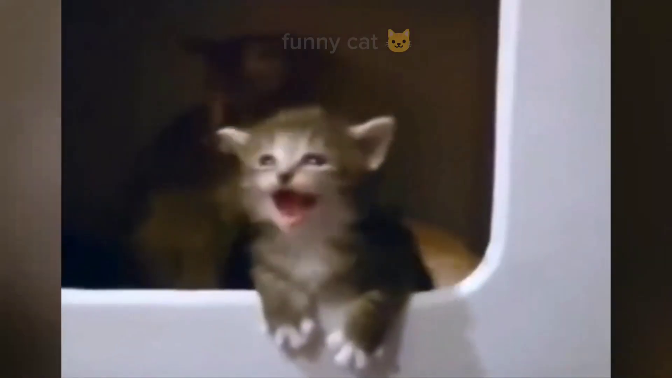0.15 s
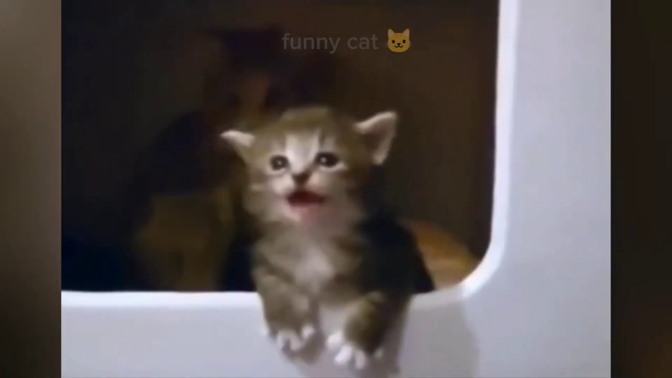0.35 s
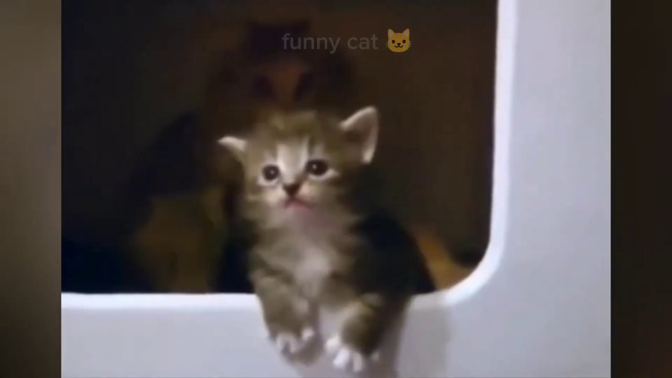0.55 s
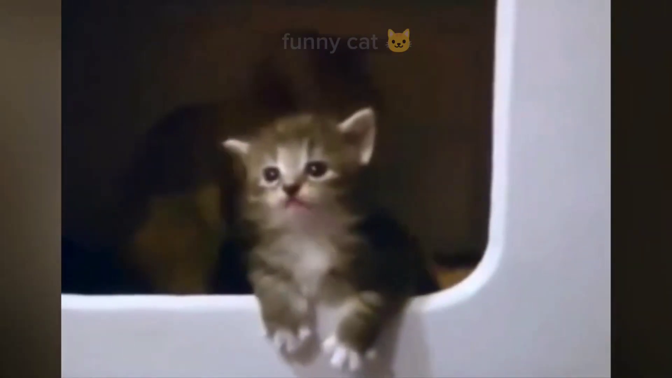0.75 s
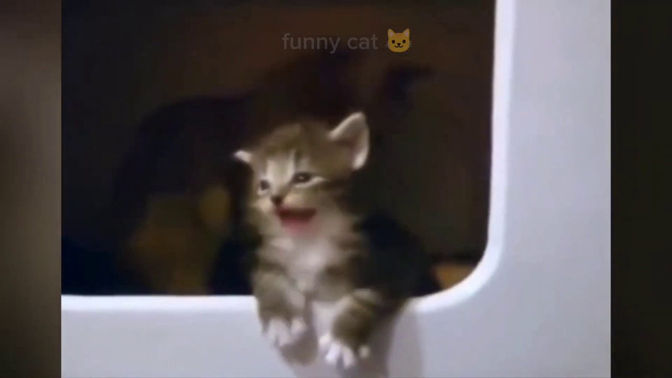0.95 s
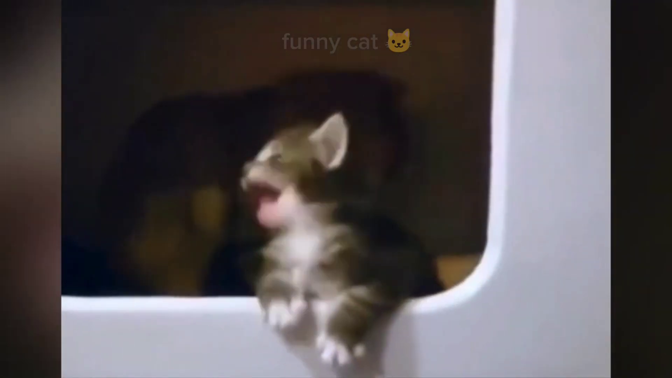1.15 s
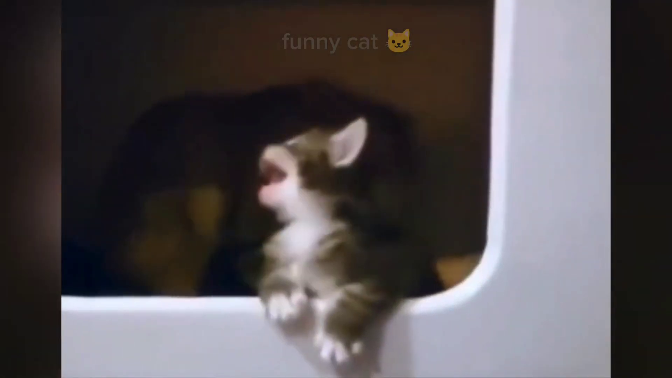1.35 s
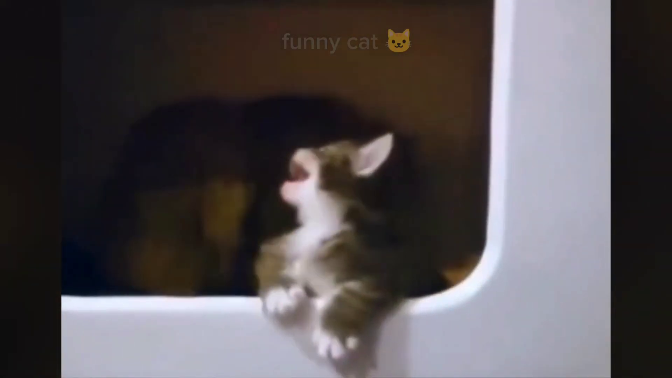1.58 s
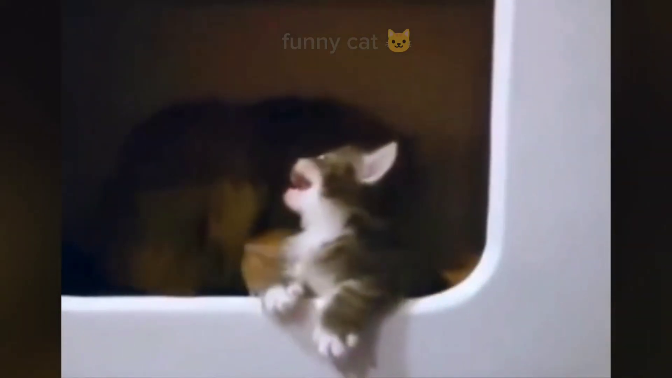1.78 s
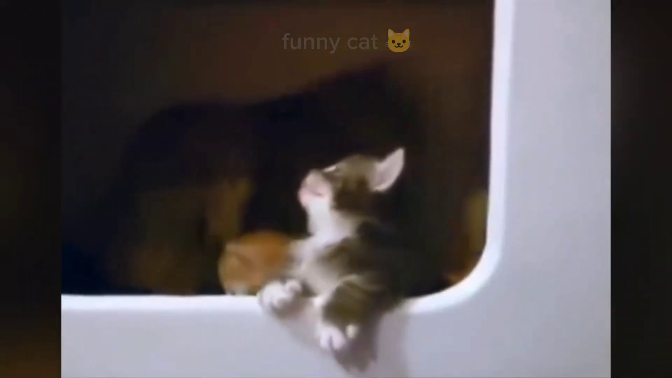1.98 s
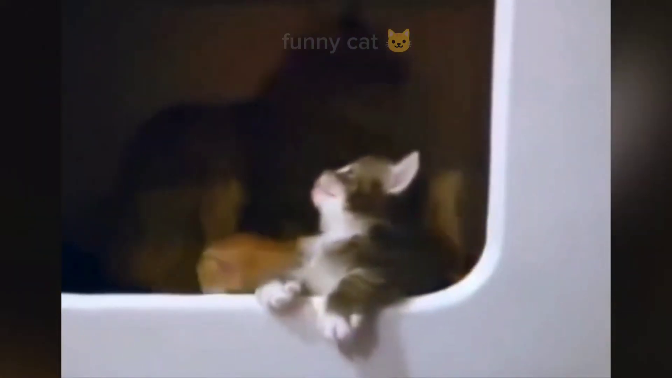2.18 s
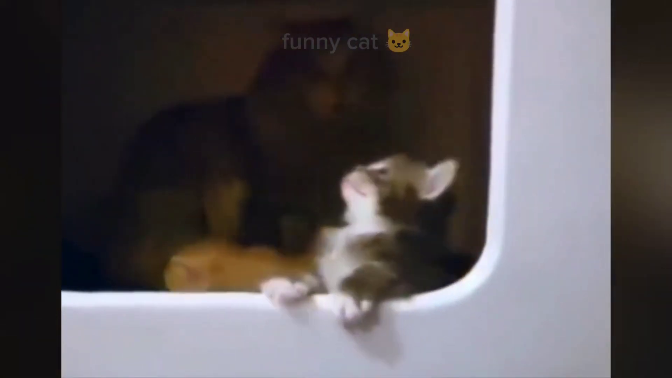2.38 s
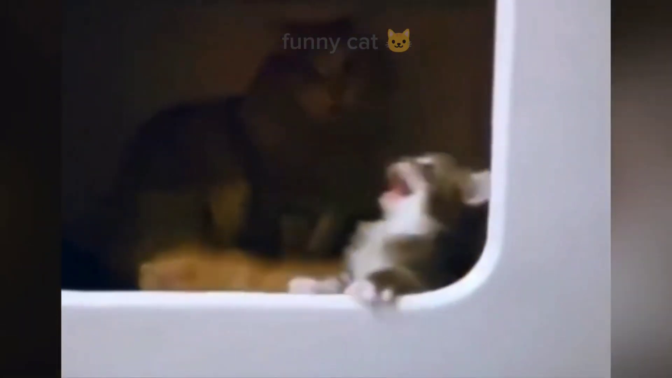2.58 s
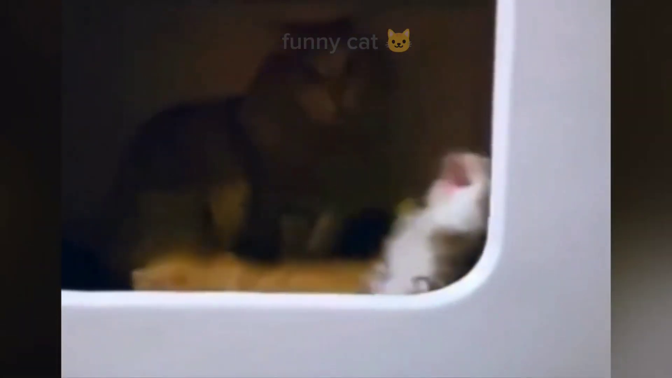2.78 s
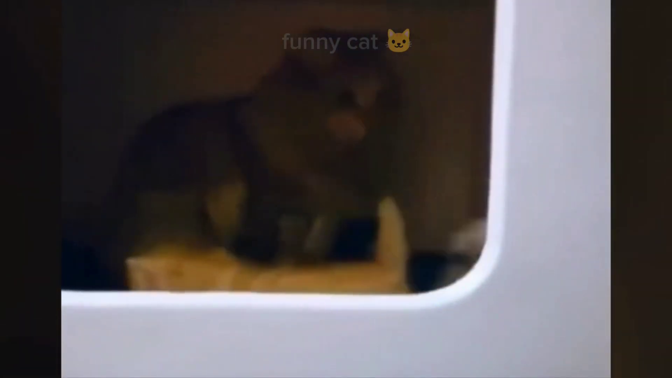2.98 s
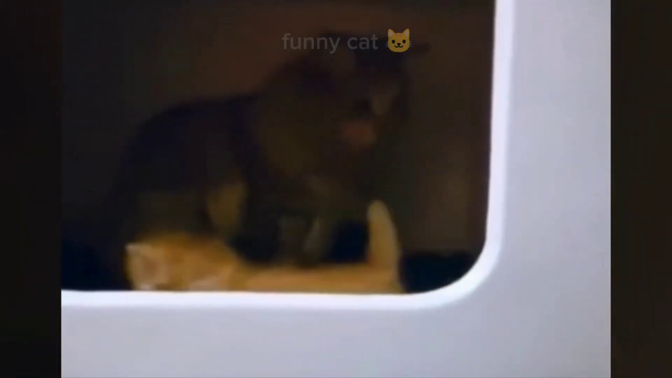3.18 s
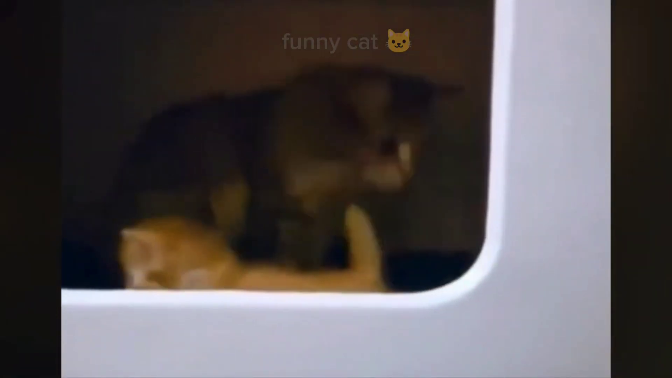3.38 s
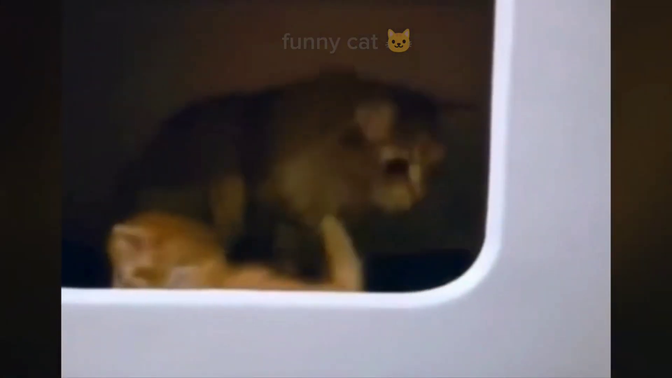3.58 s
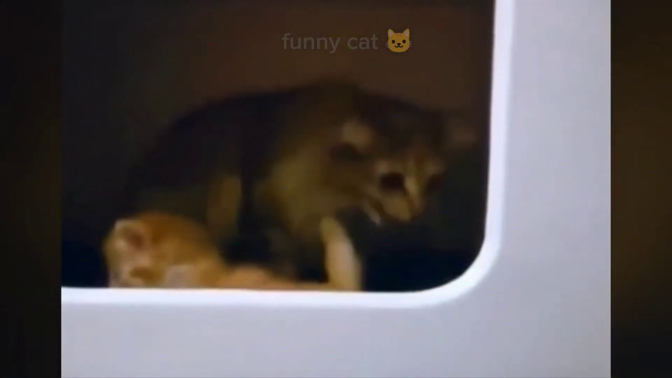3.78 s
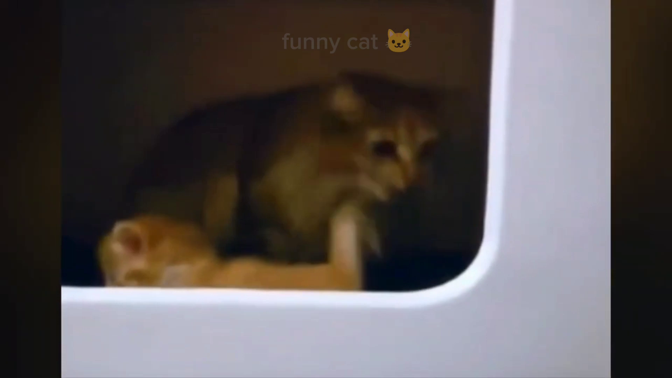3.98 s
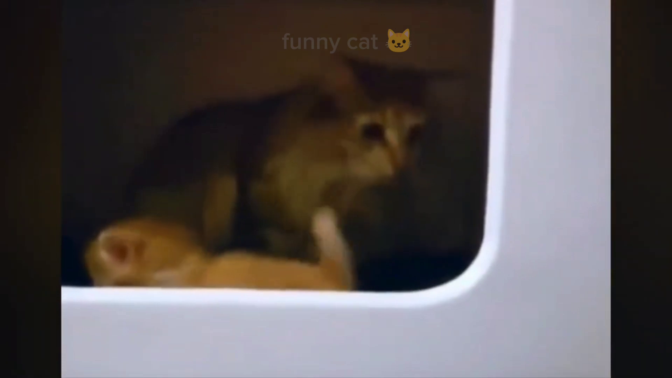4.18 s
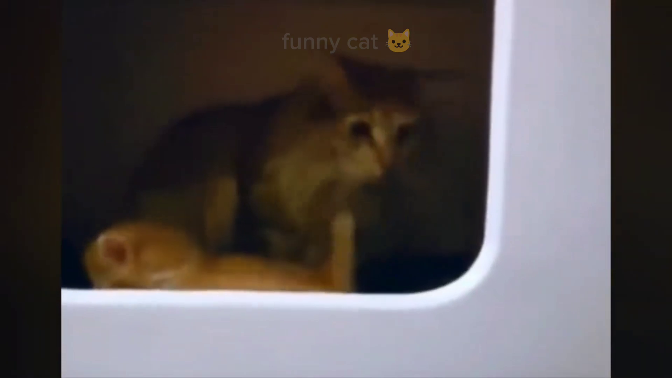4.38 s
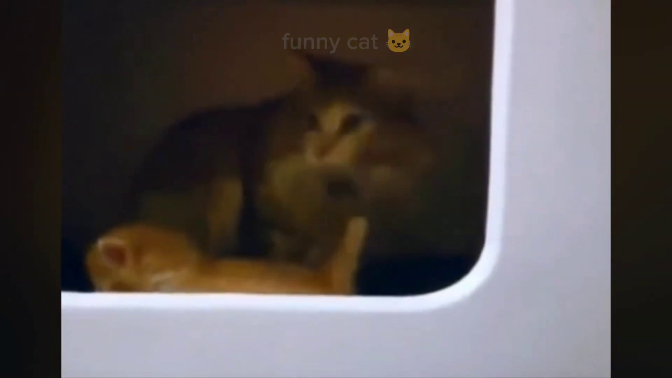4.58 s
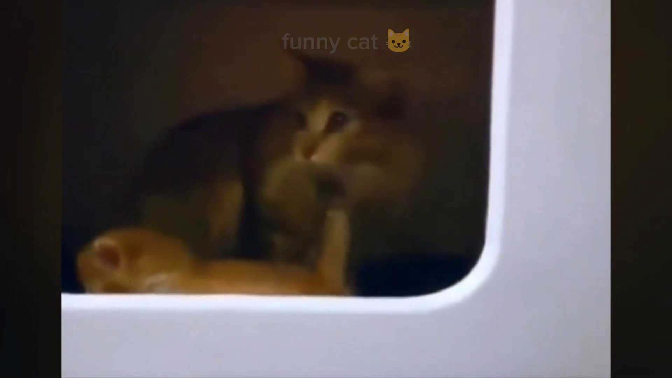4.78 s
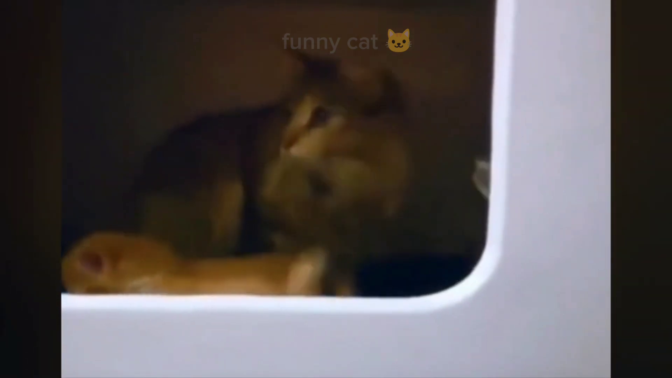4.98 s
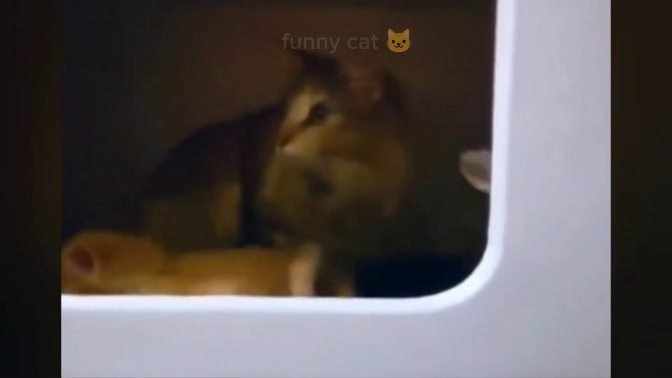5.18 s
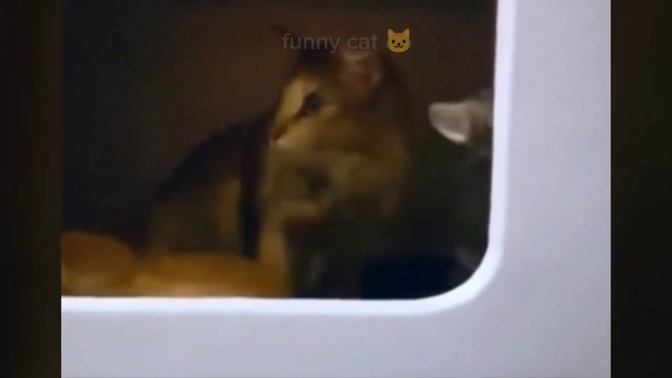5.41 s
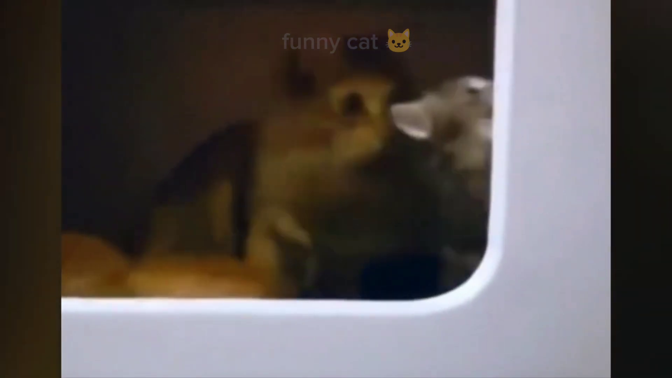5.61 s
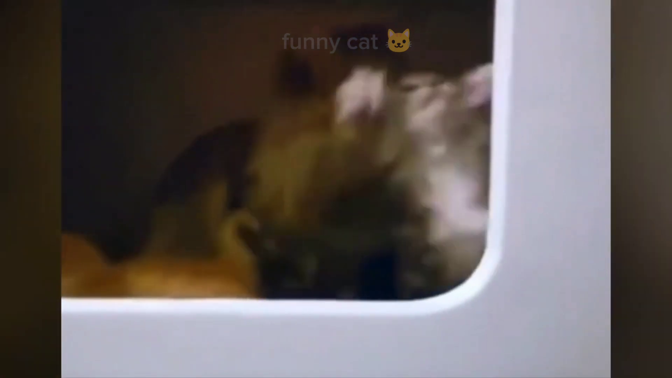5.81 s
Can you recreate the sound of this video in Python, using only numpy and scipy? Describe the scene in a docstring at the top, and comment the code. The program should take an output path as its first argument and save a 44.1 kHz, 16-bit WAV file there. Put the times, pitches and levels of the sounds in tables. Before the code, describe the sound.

A kitten mews five times in high, rising and falling cries while another answers softly, over a faint steady indoor hum.

```python
"""A kitten mews five times at the door of a plastic cat box in a small room. Its vocal folds give a nearly pure
tone that frays under strain: a rising yelp, mostly breaking into a cry that swells as the mouth opens, then a
falling whine or a squeal. A litter mate answers lower and softer from inside, the mother trills once with a
fluttering larynx, breath puffs and lip smacks sound, and paws bump the box. A mains appliance hums steadily."""
import sys
import numpy as np
from scipy import signal
from scipy.io import wavfile
from scipy.ndimage import uniform_filter1d, minimum_filter1d

SR = 44100
rng = np.random.default_rng(int(sys.argv[2]) if len(sys.argv) > 2 else 0)


def store_wav(level_fs):
    """Save 16-bit WAV to argv[1]."""
    pcm = np.round(np.clip(np.atleast_2d(level_fs), -1, 1) * 32767)
    wavfile.write(sys.argv[1], SR, pcm.T.astype(np.int16))


N = 257984
TIME = np.arange(N) / SR
CUTOFF_HZ = 13400
TREBLE_FOLLOWS = .65   # treble's share of the dB change in a yelp, whine or squeal

# Hiss of breath. Each row: frequency in Hz, relative density in dB.
HISS_SPECTRUM = [(400, -17.5), (1400, 6), (5400, 1.5), (6800, -22), (8500, -17), (11000, -6)]


def kitten(wander_share=.008, loud_jitter=.0012, soft_jitter=.007, fray_rad=.035, strained_fray_rad=.5):
    """Vocal folds sound through throat and mouth; a slack or strained voice wavers, frays and leaks air."""
    # Throat and mouth above the second harmonic. Each row: frequency in Hz, gain in dB.
    throat = [(2400, 6.5), (3100, 15), (3700, 2.5), (4500, 10), (5200, 6), (6050, 7), (7000, -11.5),
              (8400, -12), (10400, -9), (12300, -4.5), (13500, -21.5)]
    # The mew's left-right balance and phase shift as it glides. Each row: time in seconds, left minus
    # right in dB, phase between the ears in radians at the fundamental and at the second harmonic.
    stereo_image = [(.2, 3, 1.6, 1), (.25, -5, -4.9, 3), (.365, -8, -5.3, 4), (0.391, 3.5, -0.3, 3),
                    (0.426, -4.5, 1, 2), (.46, 3.5, 0.7, 1.83), (.5, -3.5, 0.3, 2.4), (1.44, 1, -0.24, 1),
                    (1.56, -2, 2, 2), (1.8, -0.5, 0, 2.5), (2.05, -2.5, 0.86, 0.2), (3.116, -5, .3, 2.03),
                    (3.175, 1.5, 0.6, .4), (4.66, 5.5, 0.6, -2.5), (4.8, -1, 0.3, 4), (5.57, -3, 0.5, 1),
                    (5.68, 12, -1.5, 4.5), (5.765, 0.5, -2.8, 0.5), (5.8, 7, -2, 3)]
    image_s, *image_columns = np.transpose(stereo_image)
    out, airflow = np.zeros((2, N)), np.zeros(N)
    jumps, flares_db = catches()
    for at, gate, pitch_hz, first_db, second_db, treble_db in (*yelps(), *cries(), *whines(), *squeals()):
        size = len(at)
        pan_db, first_rad, second_rad = [np.interp(TIME[at], image_s, column) for column in image_columns]
        slack = np.interp(np.maximum(first_db, second_db), [-48, -16], [1, 0])   # low effort, loose folds
        glide_per_s = uniform_filter1d(np.abs(np.gradient(np.log(pitch_hz))) * SR, size=1500)
        high_strain = np.interp(pitch_hz, (1490, 1680), [0, .6])
        strain = np.maximum(high_strain, np.interp(glide_per_s, (1.2, 4), [0, 1]))
        rough = np.maximum(slack, strain)
        unsteady = np.sqrt(np.maximum(rough, .2))
        wander = 1 + wander_share * unsteady * drift(22.1, size)
        jitter = loud_jitter + soft_jitter * rough ** 3
        phase = fold_phase(pitch_hz * wander * jumps[at], jitter, jitter_hz=141)
        shimmer = from_db(flares_db[at] + (.7 + 1.95 * unsteady) * drift(31, size))
        shimmer *= rms_one(from_db(3 * strain * drift(120, size)))   # strained folds scratch
        # Early and late fold closures fray the high harmonics most.
        fray = np.maximum(strain, .2 * slack ** 4)
        scatter_rad = (fray_rad + strained_fray_rad * fray) * drift(260, size)
        upper_phase, low_phase = phase + scatter_rad, phase + .18 * scatter_rad
        for ear, side in enumerate((.5, -.5)):
            pan = from_db(side * pan_db) / np.sqrt((from_db(pan_db) + from_db(-pan_db)) / 2)
            first = from_db(first_db) * np.sin(low_phase + side * first_rad)
            second = from_db(second_db) * np.sin(2 * low_phase + side * second_rad)
            ear_phase = upper_phase + .14 * side * second_rad
            treble = from_db(treble_db) * harmonics(ear_phase, pitch_hz, throat, lowest=3, count=10)
            out[ear, at] += gate * pan * shimmer * (np.sqrt(2) * (first + second) + treble)
        leak = np.maximum(np.maximum(slack ** 2, strain ** 3), .012)   # even tight folds pass some air
        airflow[at] += gate * from_db(treble_db - 5.5) * leak
    return out + airflow * stereo_noise(HISS_SPECTRUM)


def yelps(bend=1.25):
    """A mew opens: pitch and level climb with the effort, easing off towards the top."""
    # Each row: start and end in seconds, start and top pitch in Hz, final fundamental, second harmonic
    # and treble in dB, level gained on the way in dB.
    climbs = [(0.096, 0.174, 1058, 1860, -35.5, -27, -44.5, 20.5),
              (1.281, 1.421, 796, 1760, -35, -28.5, -47.5, 22),
              (2.897, 2.982, 911, 1720, -39.5, -22.5, -55.5, 31),
              (4.422, 4.504, 1095, 1683, -40, -35.5, -48.5, 10.5),
              (5.353, 5.495, 811, 1334, -46, -49.5, -49.5, 0.5),
              (5.488, 5.637, 1400, 1712, -31.5, -32.5, -54, 9)]
    for start_s, end_s, start_hz, top_hz, first_db, second_db, treble_db, swell_db in climbs:
        at, gate, progress = stretch(start_s, end_s)
        to_go = (1 - progress) ** bend
        pitch_hz = top_hz + (start_hz - top_hz) * to_go
        drop_db = swell_db * to_go
        dull_db = TREBLE_FOLLOWS * drop_db
        yield at, gate, pitch_hz, first_db - drop_db, second_db - drop_db, treble_db - dull_db


def cries(closed_db=-39, first_follows=.36, dulling_db_per_s=95.5):
    """The pitch arches while the opening mouth lifts the second harmonic far above the fundamental."""
    # Each row: start, top and end in seconds, their three pitches in Hz, widest mouth in seconds,
    # bluntness of that peak, brightest moment in seconds, peak fundamental, second harmonic, treble in dB.
    arches = [(0.174, 0.274, .469, 1234, 1553, 1392, 0.48, 1.96, 0.36, -30.5, -8.5, -28),
              (1.418, 1.551, 1.713, 1270, 1485, 1409, 1.628, 1.45, 1.567, -35, -9, -38),
              (2.978, 3.071, 3.295, 1269, 1436, 1338, 3.184, 2.18, 3.138, -39.5, -10.5, -37.5),
              (4.503, 4.633, 4.69, 1160, 1214, 1178, 4.665, 0.3, 4.61, -51.5, -35, -57.5)]
    for row in arches:
        start_s, top_s, end_s = row[:3]
        widest_s, bluntness, brightest_s, first_db, second_db, treble_db = row[6:]
        at, gate, _ = stretch(start_s, end_s)
        pitch_hz = arch(at, (start_s, top_s, end_s), row[3:6])
        closure = np.abs((TIME[at] - widest_s) / (widest_s - start_s)) ** bluntness
        drop_db = (second_db - closed_db) * closure
        dull_db = dulling_db_per_s * np.abs(TIME[at] - brightest_s)
        yield (at, gate, pitch_hz, first_db - first_follows * drop_db, second_db - drop_db,
               treble_db - dull_db)


def whines(fade_db=11.5):
    """Pitch and level sink as the air runs out."""
    # Each row: start and end in seconds, start and end pitch in Hz, exponent of the fall,
    # initial fundamental, second harmonic and treble in dB.
    falls = [(1.714, 2.206, 1616, 1069, 1, -35.5, -34, -51.5),
             (2.198, 2.234, 1342, 1207, 1.13, -49.5, -42.5, -60),
             (3.3, 3.56, 1434, 973, 2.8, -40, -37.5, -53),
             (4.687, 4.827, 1229, 866, 1.28, -42.5, -46, -60.5)]
    for start_s, end_s, start_hz, end_hz, bend, first_db, second_db, treble_db in falls:
        at, gate, progress = stretch(start_s, end_s)
        pitch_hz = start_hz + (end_hz - start_hz) * progress ** bend
        drop_db = fade_db * progress
        dull_db = TREBLE_FOLLOWS * drop_db
        yield at, gate, pitch_hz, first_db - drop_db, second_db - drop_db, treble_db - dull_db


def squeals(db_per_octave=60.5, second_follows=.25):
    """A strained arch in the high register, carried by the fundamental and loudest where highest."""
    # Each row: start, top and end in seconds, their three pitches in Hz,
    # peak fundamental, second harmonic and treble in dB.
    arches = [(0.471, 0.499, .62, 1509, 1588, 1497, -25.5, -43, -44),
              (0.619, 0.639, .729, 1620, 1783, 1216, -18.5, -43.5, -52),
              (5.638, 5.649, 5.725, 1734, 1787, 1722, -25.5, -42, -51),
              (5.723, 5.745, 5.86, 1720, 1815, 1590, -22.5, -47, -52)]
    for start_s, top_s, end_s, start_hz, top_hz, end_hz, first_db, second_db, treble_db in arches:
        at, gate, _ = stretch(start_s, end_s)
        pitch_hz = arch(at, (start_s, top_s, end_s), (start_hz, top_hz, end_hz))
        drop_db = db_per_octave * np.log2(top_hz / pitch_hz)
        yield (at, gate, pitch_hz, first_db - drop_db, second_db - second_follows * drop_db,
               treble_db - TREBLE_FOLLOWS * drop_db)


def catches(pitch_s=.027, level_s=.014):
    """The voice catches: the pitch jumps and rejoins its glide, the level dips or flares."""
    # Each row: time in seconds, jump as a share of the pitch, level change in dB.
    breaks = [(0.236, 0.062, -4), (0.577, 0.023, -0.5), (1.718, -0.00012, 7), (1.795, 0.0055, -7.5),
              (1.945, -0.069, -1), (3.26, -.012, -2.5), (4.666, -0.0186, 9.5), (5.584, 0.063, 0),
              (5.786, -0.022, -0.5)]
    jumps, flares_db = np.ones(N), np.zeros(N)
    for time_s, jump, change_db in breaks:
        age_s = TIME - time_s
        jumps += jump / 2 * np.sign(age_s) * np.exp(-np.abs(age_s) / pitch_s)
        flares_db += change_db * np.exp(-.5 * (age_s / level_s) ** 2)
    return jumps, flares_db


def ringing_bands(width_hz=96):
    """Narrow noisy bands: ringing that lingers after loud cries, rough tones in yelps and the last squeal."""
    # Each row: time in seconds, centre in Hz, level in dB.
    bands = [(0.159, 3480, -47), (.485, 3016, -37), (.53, 3170, -47), (1.41, 3315, -44.5),
             (1.723, 2880, -35.5), (1.76, 3140, -46), (2.98, 3330, -45.5), (3.308, 2727, -27),
             (5.59, 3300, -37.5), (5.645, 2646, -39.5), (5.685, 2714, -39.5), (5.746, 2542, -28.5),
             (5.784, 2653, -36), (5.825, 2570, -43), (5.77, 4570, -50)]
    return sum(from_db(level_db) * swell(time_s, time_s, rise_db_per_s=402.5, fall_db_per_s=144.5)
               * narrow_noise(hz, width_hz) for time_s, hz, level_db in bands)


def litter_mate(top_share=.38, sag=.047, shimmer_db=2):
    """Short arched mews, lower and reedier than the kitten's."""
    # Each row: start and end in seconds, top pitch in Hz, fundamental and overtones in dB.
    answers = [(-.2, 0.27, 786, -38.5, -47), (1.365, 1.709, 798, -45.5, -56.5),
               (2.753, 3.081, 751.4, -49.5, -42), (4.119, 4.324, 858, -40.5, -38.5)]
    # Throat. Each row: frequency in Hz, gain in dB.
    throat = [(1550, -5), (2280, 10.5), (2600, -5), (3000, -3.5), (3500, 5), (4250, -1.5), (4600, -8.5),
              (5300, -12), (6000, -24), (8000, -36.5)]
    out = np.zeros(N)
    for start_s, end_s, top_hz, first_db, overtones_db in answers:
        at, gate, _ = stretch(start_s, end_s, fade_s=.008)
        times_s = start_s, start_s + top_share * (end_s - start_s), end_s
        pitch_hz = top_hz * arch(at, times_s, (1 - sag, 1, 1 - sag))
        effort = gate * from_db(arch(at, times_s, (-7.5, 0, -10.5)))
        phase = fold_phase(pitch_hz, jitter=.011, jitter_hz=167.4)
        first = from_db(first_db) * np.sqrt(2) * np.sin(phase)
        overtones = from_db(overtones_db) * harmonics(phase, pitch_hz, throat, lowest=2, count=13)
        shimmer = from_db(shimmer_db * drift(50, len(at)))
        out[at] += effort * (first + shimmer * overtones)
    return out


def mother(flutter_hz=43, bend=.037, chop_depth=.5):
    """A closed-mouth trill: the larynx flutters, chopping and bending the tone."""
    # Start, top and end of the trill. Each row: time in seconds, pitch in Hz, level in dB.
    contour = [(3.67, 480, -51), (3.883, 526.7, -41), (4.039, 344, -50)]
    # Nearly closed mouth. Each row: frequency in Hz, gain in dB.
    throat = [(520, 2.5), (1080, -3), (1600, -13), (4000, -32)]
    times_s, pitches_hz, levels_db = np.transpose(contour)
    at, gate, _ = stretch(times_s[0], times_s[-1], fade_s=.01)
    pitch_hz = arch(at, times_s, pitches_hz)
    effort = gate * from_db(arch(at, times_s, levels_db))
    flutter = np.sin(fold_phase(np.full(len(at), flutter_hz), jitter=.097, jitter_hz=7.4))
    phase = fold_phase(pitch_hz * (1 + bend * flutter), jitter=.0288, jitter_hz=122)
    out = np.zeros(N)
    out[at] = effort * (1 + chop_depth * flutter) * harmonics(phase, pitch_hz, throat, lowest=1, count=8)
    return out


def body_bumps():
    """Bodies bump the box and its floor thuds."""
    # Each row: time in seconds, level in dB.
    bumps = [(1.115, -51.5), (3.412, -34.5), (3.423, -29), (3.457, -38.5)]
    # Each row: frequency in Hz, gain in dB, T60 in seconds.
    floor_modes = [(91.5, -11.5, 0.51), (149, 7, 0.082), (184, -17, 0.16)]
    return struck_panel(bumps, floor_modes, contact_hz=400)


def claw_knock():
    """Claws knock the box wall, a harder contact."""
    # Each row: time in seconds, level in dB.
    knocks = [(3.376, -40)]
    # Each row: frequency in Hz, gain in dB, T60 in seconds.
    wall_modes = [(447.5, 7.5, 0.24), (864, 10.5, 0.046)]
    return struck_panel(knocks, wall_modes, contact_hz=2420)


def puffs(width_s=.019, grain_db=2):
    """Breath puffs and lip smacks: short, grainy bursts of hiss."""
    # Each row: time in seconds, level in dB.
    strokes = [(0.739, -46), (1.266, -49), (2.29, -54.5), (2.754, -50.5), (3.45, -44), (4.34, -50.5),
               (5.207, -53)]
    envelope = sum(from_db(db) * np.exp(-.5 * ((TIME - time_s) / width_s) ** 2) for time_s, db in strokes)
    return envelope * from_db(grain_db * drift(90, N)) * stereo_noise(HISS_SPECTRUM)


def bedding(rest_db=-61.5, patchy_db=2):
    """The cats shift on the bedding; a soft stir never stops."""
    # Each row: start and end in seconds, level in dB.
    shifts = [(2.933, 2.993, -45.5), (3.374, 3.44, -47.5), (3.734, 4.055, -50.5), (4.33, 4.448, -45.5),
              (5.452, 5.84, -52.5)]
    # Each row: frequency in Hz, relative density in dB.
    rustle_spectrum = [(150, 7.5), (310, 5.5), (440, 2.5), (700, 4.5), (1400, -1), (1950, 4), (2500, -5.5),
                       (4500, -5), (8000, -26.5)]
    swells = [from_db(level_db) * swell(start_s, end_s, rise_db_per_s=52.5, fall_db_per_s=24.5)
              for start_s, end_s, level_db in shifts]
    envelope = np.maximum(np.max(swells, axis=0), from_db(rest_db))
    return envelope * from_db(patchy_db * drift(20, N)) * stereo_noise(rustle_spectrum)


def appliance(waver=.042, left_db=-5, right_db=-1.5, rumble_db=-52.5):
    """Mains hum and a droning casing over low rumble and faint hiss."""
    # Each row: frequency in Hz, level in dB.
    mains_tones = [(49, -52), (100, -43.5)]
    # Each row: frequency in Hz, width in Hz, level in dB.
    casing_modes = [(477, 130, -58.5), (544.5, 35, -54.5)]
    # Each row: frequency in Hz, relative density in dB.
    rumble_spectrum = [(15, -40), (25, -6.5), (54, 5), (70, -0.5), (104, -2), (175, -9.5), (357, -51),
                       (544, -16), (708, -61), (3620, -77), (13500, -34)]
    hum = sum(from_db(db) * (np.sqrt(2) * np.sin(2 * np.pi * hz * TIME) + waver * narrow_noise(hz, 13))
              for hz, db in mains_tones)
    drone = sum(from_db(db) * narrow_noise(hz, width_hz) for hz, width_hz, db in casing_modes)
    rumble = from_db(rumble_db) * stereo_noise(rumble_spectrum)
    return (hum + drone) * from_db([[left_db], [right_db]]) + rumble


def echoes(x, t60_s, delay_s):
    """Dense reflections dying away, different in each ear."""
    t = TIME[:SR * 3 // 4]
    tail = rng.standard_normal((2, len(t))) * from_db(-60 * t / t60_s) * (t > delay_s)
    tail /= np.sqrt((tail ** 2).sum(axis=1, keepdims=True))
    return signal.fftconvolve(x, tail, axes=1)[:, :N]


def fold_phase(pitch_hz, jitter, jitter_hz):
    """Phase of vocal folds whose period wavers."""
    return 2 * np.pi * np.cumsum(pitch_hz * (1 + jitter * drift(jitter_hz, len(pitch_hz)))) / SR


def harmonics(phase, pitch_hz, throat, lowest, count, uneven_db=4):
    """Harmonics weighted by the throat, each swelling and fading on its own; rms about 1."""
    orders = np.arange(lowest, lowest + count)[:, None]
    gain = from_db(at_hz(throat, orders * pitch_hz)) * (orders * pitch_hz < CUTOFF_HZ)
    uneven = np.array([rms_one(from_db(uneven_db * drift(9, len(pitch_hz)))) for _ in orders])
    return (uneven * gain * np.sin(orders * phase)).sum(axis=0) / np.sqrt((gain ** 2).sum(axis=0) / 2)


def struck_panel(hits, modes, contact_hz):
    """Clicks, softened by the contact, ring a panel's damped modes."""
    clicks = np.zeros(N)
    for time_s, level_db in hits:
        clicks[int(time_s * SR)] = from_db(level_db)
    push = signal.sosfilt(signal.butter(2, contact_hz, fs=SR, output="sos"), clicks) + 1e-18
    out = np.zeros(N)
    for hz, gain_db, t60_s in modes:
        r, w = from_db(-60 / (t60_s * SR)), 2 * np.pi * hz / SR
        out += from_db(gain_db) * signal.lfilter([0, np.sin(w)], [1, -2 * r * np.cos(w), r * r], push)
    return out


def stretch(start_s, end_s, fade_s=.007):
    """Sample indices, soft gate and progress (0-1) of one stretch of voice."""
    at = np.flatnonzero((TIME > start_s - fade_s) & (TIME < end_s + fade_s))
    edge = np.clip(np.minimum(TIME[at] - start_s, end_s - TIME[at]) / (2 * fade_s) + .5, 0, 1)
    progress = np.clip((TIME[at] - start_s) / (end_s - start_s), 0, 1)
    return at, np.sin(np.pi / 2 * edge) ** 2, progress


def arch(at, times_s, values):
    """Rise to a top, then fall ever faster."""
    (start_s, top_s, end_s), (start, top, end) = times_s, values
    before = np.interp(TIME[at], [start_s, top_s], [1, 0])
    after = np.interp(TIME[at], [top_s, end_s], [0, 1])
    return top + (start - top) * before ** 1.2 + (end - top) * after ** 1.6


def swell(start_s, end_s, rise_db_per_s, fall_db_per_s):
    """Gain that rises until the start, holds, and falls after the end."""
    early_s, late_s = np.maximum(start_s - TIME, 0), np.maximum(TIME - end_s, 0)
    return from_db(-rise_db_per_s * early_s - fall_db_per_s * late_s)


def stereo_noise(spectrum):
    """Half-octave noise bands, narrow in the bass and wider higher up; rms 1."""
    out, edges_hz = 0, 28 * 2 ** np.arange(0, 9.6, .5)
    white = rng.standard_normal((2, 2, N))
    for k, (low_hz, high_hz) in enumerate(zip(edges_hz, edges_hz[1:])):
        bandpass = signal.butter(2, [low_hz, high_hz], "band", fs=SR, output="sos")
        mid, side = signal.sosfilt(bandpass, white[k % 2])
        hz = np.sqrt(low_hz * high_hz)
        width = from_db(at_hz([(150, -9), (600, -3), (2500, 1.5)], hz))
        out = out + from_db(at_hz(spectrum, hz)) * (mid + width * side * [[1], [-1]])
    return rms_one(out)


def narrow_noise(hz, width_hz):
    """Noise around one frequency; rms about 1."""
    phase = 2 * np.pi * hz * TIME
    return drift(width_hz / 2, N) * np.cos(phase) + drift(width_hz / 2, N) * np.sin(phase)


def drift(rate_hz, size):
    """Smooth random motion; rms 1."""
    r = np.exp(-2 * np.pi * rate_hz / SR)
    smooth = signal.lfilter([1], [1, -2 * r, r * r], rng.standard_normal(size + SR // 2))
    return rms_one(smooth[SR // 2:])


def at_hz(points, hz):
    """Read a spectrum on a log-frequency axis."""
    points_hz, values = np.transpose(points)
    return np.interp(np.log(hz), np.log(points_hz), values)


def rms_one(x):
    """Scale to unit power."""
    return x / np.sqrt(np.mean(x ** 2) + 1e-20)


def from_db(db):
    """Decibels to gain."""
    return 10 ** (np.asarray(db) / 20)


def scene(box_db=-15, room_db=-21):
    """The cats echo in the box and the room, over rustle and hum."""
    mono = litter_mate() + mother() + ringing_bands() + body_bumps() + claw_knock()
    cats = kitten() + mono * from_db([[-1.5], [0]])
    box = from_db(box_db) * echoes(cats, t60_s=.06, delay_s=.00065)
    room = from_db(room_db) * echoes(cats, t60_s=.36, delay_s=.013)
    return cats + box + room + puffs() + bedding() + appliance()


def record(dry, ceiling=.7):
    """A small microphone loses the deepest bass, a limiter holds the peaks, the top is cut steeply."""
    thin = signal.sosfilt(signal.butter(4, 36, "high", fs=SR, output="sos"), dry)
    needed_gain = ceiling / np.maximum(np.abs(thin).max(axis=0), ceiling)
    held = thin * uniform_filter1d(minimum_filter1d(needed_gain, size=600), size=400)
    return signal.sosfilt(signal.ellip(10, .2, 80, CUTOFF_HZ, fs=SR, output="sos"), held)


dry = scene()
out = record(dry)
store_wav(out)
```